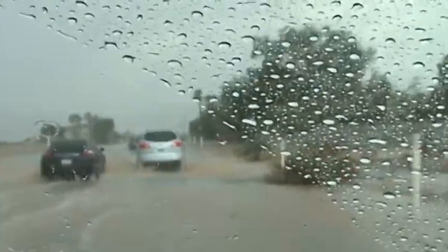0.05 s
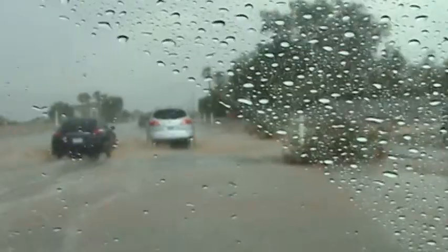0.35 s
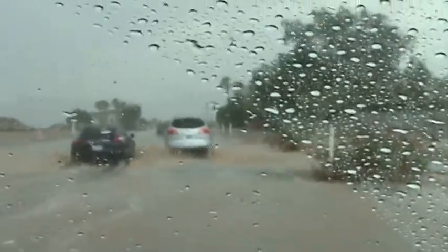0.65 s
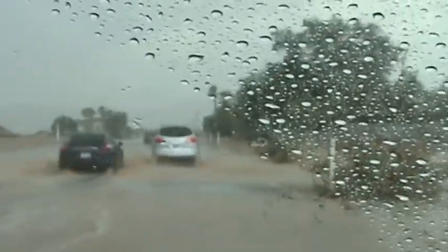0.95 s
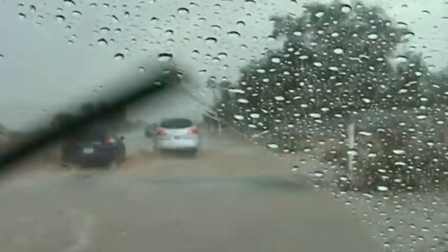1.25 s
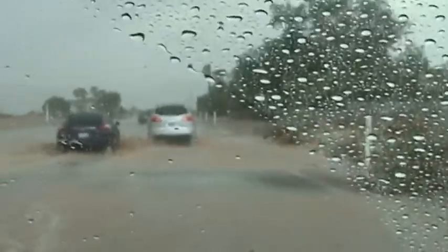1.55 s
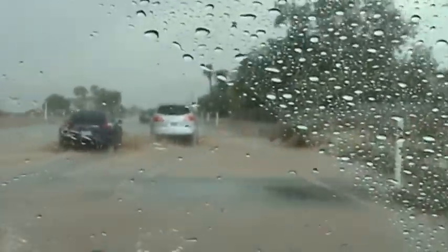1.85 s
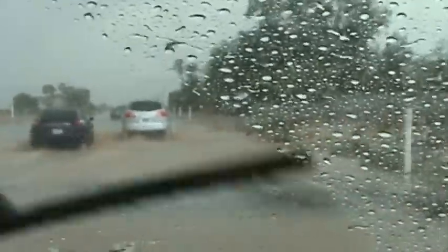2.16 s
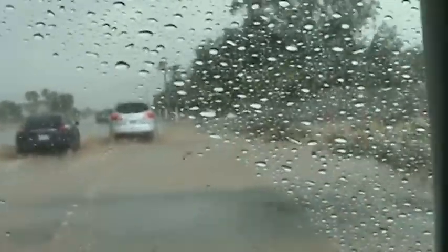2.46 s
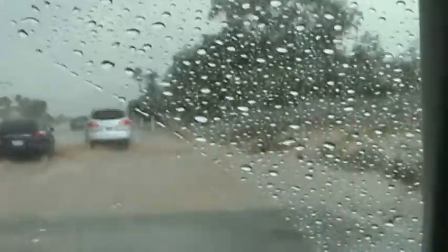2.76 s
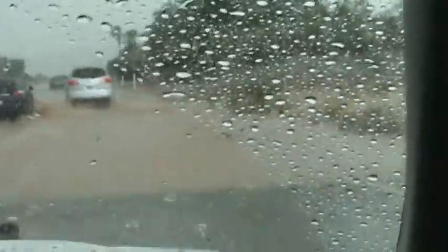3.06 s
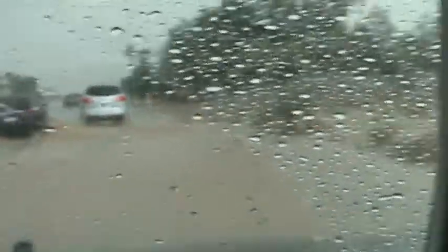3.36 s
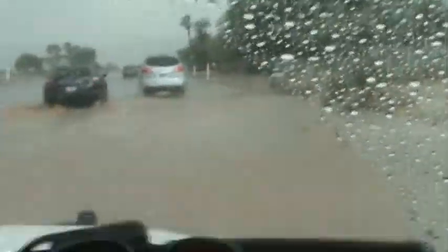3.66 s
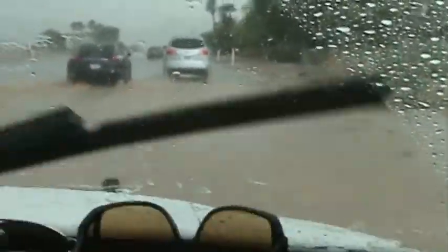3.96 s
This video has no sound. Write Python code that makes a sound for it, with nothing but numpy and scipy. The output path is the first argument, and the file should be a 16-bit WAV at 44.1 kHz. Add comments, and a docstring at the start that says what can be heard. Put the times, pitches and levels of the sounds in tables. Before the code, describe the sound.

Rain patters on a windscreen, heard inside a moving car over a low engine hum and road rumble. From about 1.8 seconds the rain thickens and floodwater churns louder, drumming and knocking under the floor. Fat drops smack the glass, sparse at first and densest from 3.3 to 4 seconds. Soft, deep wiper thumps come between 0.5 and 1 second, near 2.4, and after 3.2.

```python
"""Heavy rain on a windscreen, heard from inside a car driving along a flooded road.
Fine drops patter on the glass in flurries and fat ones smack it with a bright spray.
The tyres churn water under the floor, where it drums in waves and knocks on the panels.
Underneath, the engine hums, the cabin booms with the road, and the wipers thump softly as they turn."""
import sys
import numpy as np
from scipy import signal
from scipy.fft import rfft, irfft
from scipy.io import wavfile
from scipy.ndimage import uniform_filter1d

SR = 44100
rng = np.random.default_rng(int(sys.argv[2]) if len(sys.argv) > 2 else 0)


def int16_out(signal):
    """Quantize to a 16-bit WAV file."""
    q = np.round(np.clip(np.atleast_2d(signal).T, -1, 1) * 32767)
    wavfile.write(sys.argv[1], SR, q.astype(np.int16))


N = 176400

# tone of a drop smacking the glass: (frequency [Hz], relative level [dB])
SMACK_COLOUR = [(500,-21),(1200,-11),(2000,-4),(2500,0),(3100,2.5),(4500,-1),(7000,-12.5),(12000,-45)]


def undb(db):
    """Decibels to gain."""
    return 10 ** (np.asarray(db) / 20)


def curve(rows):
    """Join (time [s], value) points by straight lines."""
    return np.interp(np.arange(N) / SR, *np.array(rows).T)


def over_freq(rows, size=N):
    """Join (frequency [Hz], value) points on a log-frequency axis."""
    hz, value = np.array(rows, float).T
    return np.interp(np.log(np.arange(size // 2 + 1) * SR / size + 1), np.log(hz + 1), value)


def colour(x, rows):
    """Minimum-phase EQ of unit energy, shaped by (frequency [Hz], level [dB]) points."""
    size = 32768
    cepstrum = irfft(np.log(undb(over_freq(rows, size))), size)
    cepstrum[1:size // 2] *= 2  # folded forward, so the ring follows the hit
    cepstrum[size // 2 + 1:] = 0
    ring = irfft(np.exp(rfft(cepstrum)), size)[:size // 2]
    return signal.fftconvolve(x, ring[None] / np.linalg.norm(ring), axes=1)[:, :x.shape[1]]


def drift(per_s):
    """Smooth random wander with a spread near 1."""
    hold = int(SR / per_s)
    steps = np.repeat(rng.standard_normal(N // hold + 1), hold)
    return np.sqrt(2) * uniform_filter1d(uniform_filter1d(steps, hold), hold)[:N]


def impacts(per_s, spread_db, decay_s, tail_db):
    """Two independent showers of hits at rms 1, most weak, a few strong, each with a noisy splash."""
    strength = undb(spread_db * np.minimum(rng.exponential(size=(2, N)), 6))
    hits = (rng.random((2, N)) < per_s / SR) * strength * rng.choice([-1, 1], (2, N))
    pole = np.exp(-2 / (decay_s * SR))
    splash_env = np.sqrt(signal.lfilter([1 - pole], [1, -pole], hits ** 2))
    shower = hits + undb(tail_db) * splash_env * rng.standard_normal((2, N))
    return shower / np.sqrt(np.mean(shower ** 2))


def thud(at, db, hz, rise_s):
    """A soft blow that swells and dies in a low resonance of the car."""
    age = np.maximum(np.arange(N) / SR - at, 0)
    env = age / rise_s * np.exp(1 - age / rise_s)
    return undb(db) * env * np.sin(2 * np.pi * (hz * age + rng.random()))


def road_rumble():
    """The road shakes the panels and makes the cabin air boom."""
    # rumble through the body: (time [s], relative level [dB])
    road_level = [(0,-32),(.6,-31.5),(1.2,-35.5),(1.6,-35),(1.75,-27.5),(1.95,-28.5),(2.2,-28.5),(2.35,-28.5),(2.55,-26.5),(2.7,-24.5),(3.35,-26),(3.5,-30),(4,-29.5)]
    # its tone: (frequency [Hz], relative level [dB])
    road_colour = [(40,-16),(80,0.5),(100,-3),(125,1.5),(165,2),(195,-5.5),(225,-3),(270,-11),(400,-23.5),(1000,-67)]
    # cabin boom: (time [s], level [dB])
    boom_level = [(0,-27.5),(.4,-24),(.8,-31.5),(1.15,-28.5),(1.5,-22.5),(2.1,-30.5),(2.7,-23),(3.3,-24),(3.5,-28.5),(4,-23.5)]
    # its tone: (frequency [Hz], relative level [dB])
    boom_colour = [(5,-20),(15,-6),(25,-6.5),(35,-9.5),(44,2),(52,5),(60,-2.5),(72,-14.5),(110,-12),(300,-74)]
    road = colour(rng.standard_normal((2, N)), road_colour) * undb(curve(road_level) + 0.5)
    boom = colour(rng.standard_normal((2, N)), boom_colour) * undb(curve(boom_level))
    return road + boom


def engine():
    """A low hum of three firing orders, wavering in pitch and strength."""
    # engine speed: (time [s], firing rate [Hz])
    firing_rate = [(0,82.3),(.45,77.4),(.75,79.8),(1.05,84.03),(1.5,85.3),(1.8,83.5),(2.25,80.16),(2.5,85.7),(2.7,79.4),(2.95,84.2),(3.3,82),(3.7,84.97),(4,84.3)]
    # first three orders: (level [dB])
    orders_db = [-38.5,-38.5,-53.5]
    pitch_waver, waver_db = 0.01224, 3.5
    phase = 2 * np.pi * np.cumsum(curve(firing_rate) * (1 + pitch_waver * drift(14))) / SR
    return sum(np.sqrt(2) * np.sin(order * phase) * undb(db + waver_db * drift(9))
               for order, db in enumerate(orders_db, 1))


def wiper_thumps():
    """The wipers and the car's body give deep, soft thumps."""
    # thumps: (time [s], level [dB])
    thumps = [(.505,-17.5),(0.614,-16.5),(0.956,-17),(2.371,-13),(3.24,-15.5),(3.585,-12),(3.815,-18.5)]
    return sum(thud(at, db, hz=51.3, rise_s=0.0093) for at, db in thumps)


def tyre_churn():
    """Water thrown by the tyres slaps the wheel arches and floor in a dense, uneven wash."""
    # water under the wheels: (time [s], relative level [dB])
    churn_level = [(0,-37),(.35,-38.5),(.8,-37.5),(1.3,-36.5),(1.8,-35),(2.1,-30.5),(2.45,-32.5),(2.8,-30),(3.2,-29),(3.5,-30),(3.8,-33),(4,-32.5)]
    # its tone: (frequency [Hz], relative level [dB])
    churn_colour = [(150,-13.5),(230,-6),(300,0.5),(400,1.5),(520,0),(700,-6.5),(950,-5.5),(1150,-12.5),(1600,-16),(3000,-20.5),(8000,-66)]
    slaps = impacts(per_s=1800, spread_db=2.5, decay_s=0.017, tail_db=-2)
    return colour(slaps, churn_colour) * undb(curve(churn_level) - 0.5 + drift(18))


def floor_surges():
    """Waves of floodwater drum on the floor pan."""
    # waves: (time [s], level [dB], pitch [Hz])
    surges = [(1.65,-22.5,162),(1.752,-18,164.7),(2.01,-24.5,226.5),(2.315,-22,159.7),(2.465,-21.5,209.6),(2.61,-23,183),(2.68,-23.5,165),(2.865,-17,169),(3.31,-19,165)]
    return sum(thud(at, db, hz, rise_s=0.014) for at, db, hz in surges)


def panel_knocks():
    """Slugs of thrown water strike the panels, which ring short and hollow."""
    # strikes: (time [s], relative level [dB], pitch [Hz], decay [ms])
    knocks = [(.329,-24.5,510,9.6),(.408,-21.5,560,7),(.921,-26,487,13.5),(1.777,-25,540,8.7),(1.889,-28,500,18),(2.55,-24,900,5.9),(3.293,-23.5,558,11),(3.774,-23,802,9),(3.7925,-12.5,865,5.5)]
    # panel resonances: (multiple of the pitch, relative level [dB])
    modes = [(1,-2.5),(1.34,-10.5),(1.54,-13),(2.08,-13.5)]
    rise_s = 0.00083
    out = np.zeros(N)
    for at, db, hz, decay_ms in knocks:
        age = np.maximum(np.arange(N) / SR - at, 0)
        env = (1 - np.exp(-age / rise_s)) * np.exp(-age * 1000 / decay_ms)
        for ratio, mode_db in modes:
            out += env * undb(db + mode_db) * np.sin(2 * np.pi * hz * ratio * age)
    return out


def fine_rain():
    """Fine drops patter on the glass in flurries; middling ones tick through, under a bright mist."""
    # patter and ticks: (time [s], relative level [dB])
    rain_level = [(0,-39),(.08,-45),(.25,-46.5),(.4,-48.5),(.53,-45.5),(.59,-44),(.8,-43.5),(1,-42),(1.22,-43),(1.38,-47),(1.5,-41.5),(1.68,-46.5),(1.86,-45),(1.96,-39),(2.05,-33.5),(2.2,-35.5),(2.35,-39.5),(2.65,-38),(2.9,-38),(3.15,-40),(3.28,-38),(3.37,-35),(3.5,-40.5),(3.78,-41),(4,-41.5)]
    # tone of the patter: (frequency [Hz], relative level [dB])
    patter_colour = [(500,-11.5),(900,-8),(1300,-4),(1900,-3.5),(2400,-6.5),(3100,-2),(4300,-6.5),(5500,-11.5),(7000,-15.5),(8750,-19),(11800,-27.5),(15500,-39.5)]
    # finest spray, thickening in the downpour: (time [s], level [dB])
    mist_level = [(0,-55),(.4,-73),(.53,-65),(.6,-60),(1.2,-62),(1.4,-66),(1.5,-57),(1.85,-70),(1.95,-50.5),(2.06,-49),(2.3,-55),(2.9,-51),(3.4,-53.5),(4,-50)]
    # its tone: (frequency [Hz], relative level [dB])
    mist_colour = [(2000,-30),(4500,3.5),(7000,4),(10000,-7.5),(13000,-23),(16000,-25)]
    patter = colour(impacts(per_s=2500, spread_db=3.5, decay_s=0.014, tail_db=1), patter_colour)
    ticks = colour(impacts(per_s=70, spread_db=0.5, decay_s=0.0027, tail_db=6), SMACK_COLOUR)
    mist = colour(impacts(per_s=300, spread_db=4.5, decay_s=0.0014, tail_db=-4.5), mist_colour)
    drops = (patter + undb(-9.5) * ticks) * undb(curve(rain_level) + 1)
    flutter = undb(0.5 * drift(24.24))
    return (drops + mist * undb(curve(mist_level))) * flutter


def fat_drops():
    """Each fat drop clicks, bursts at a pitch set by where it lands, and leaves a faint cabin tail."""
    # drops on the glass and bodywork, at relative levels:
    # (time [s], knock [dB], smack [dB], spray [dB], burst decay [ms], pitch factor of knock and smack)
    drops = [(.573,-40,-31,-42,2.4,1.1),(0.9197,-21.5,-23,-39,3.3,0.74),(1.4956,-48,-27.5,-38.5,4.7,1.05),
             (1.753,-42,-31,-42,2,0.95),(1.7757,-22,-19.5,-39,2.9,0.9),(1.880,-46,-30.5,-41.5,2.8,1),(1.9215,-34,-23.5,-35.5,5.2,0.97),(2.028,-31,-32,-40,14,1),(2.108,-36,-35,-42,8,1.4),(2.181,-36,-31,-43,2.5,1.1),(2.24,-40,-37,-38,2,1.3),(2.424,-26.5,-32,-40,10,1.05),
             (2.5446,-22,-21,-36.5,4.6,0.96),(2.7345,-28,-23,-39,4.15,0.8),(2.83,-40,-27,-43,3,0.83),(2.8714,-28,-24.5,-34,5.1,0.88),(2.946,-22,-22.5,-36.5,4,1.1),(3.1231,-23,-29,-37.5,3.5,0.85),
             (3.267,-37,-27.5,-41,3.6,0.98),(3.286,-23,-26.5,-42,4.7,0.94),(3.355,-30,-33,-44,4,0.88),(3.373,-41,-27,-44,2.5,1.25),(3.465,-42,-31,-37,1,1.2),(3.5385,-28,-27,-32.5,.8,1.24),(3.5616,-20,-21,-36.5,5.6,0.79),(3.572,-23.5,-22.5,-40,6.2,0.92),
             (3.5887,-20.5,-19,-28.5,4.55,1),(3.663,-23.5,-26,-41,3.9,0.7),(3.698,-37,-29.5,-62,4.6,0.8),(3.7334,-24.5,-23,-32.5,6,0.89),
             (3.808,-34,-26.5,-34.5,7.4,0.98),(3.830,-28,-25.5,-35,5.5,1.16),(3.8991,-37,-19,-32,2.8,1.2),(3.9213,-28,-20,-33,4.3,0.99),(3.942,-38,-26.5,-29.5,5.9,0.73)]
    # a drop's low knock: (frequency [Hz], relative level [dB])
    knock_colour = [(100,-28),(250,1),(500,-2.5),(850,-2),(1400,-3.5),(2300,-5.5),(6000,-70)]
    # its bright spray: (frequency [Hz], relative level [dB])
    spray_colour = [(2000,-42),(4500,-2.5),(7000,5),(10500,-3.5),(13000,-12),(16000,-24)]
    rise_s, tail_s = 0.00073, 0.019
    click_db, tail_db, trim_db = 10.5, -14, 0.94
    t = np.arange(4096) / SR
    click = undb(click_db) * (t == 0)
    tail = undb(tail_db) * np.exp(-t / tail_s)
    out = np.zeros((2, N + len(t)))
    for at, knock_db, smack_db, spray_db, decay_ms, pitch in drops:
        burst = np.exp(-t * 1000 / decay_ms)
        env = (1 - np.exp(-t / rise_s)) * (burst + tail)
        start = int(at * SR)
        for db, shape, shift in ((knock_db, knock_colour, pitch),
                                 (smack_db, SMACK_COLOUR, pitch),
                                 (spray_db, spray_colour, 1)):
            splash = click + rng.choice([-1, 1], (2, len(t))) * env
            tuned_shape = np.array(shape) * [shift, 1]
            out[:, start:start + len(t)] += undb(db + trim_db) * colour(splash, tuned_shape)
    return out[:, :N]


def scene():
    """Mix the cabin in mid and side, then spread it to left and right band by band."""
    # stereo image: (frequency [Hz], left minus right [dB], side level [dB], left phase lead [rad])
    image = [(30,-1.5,-32,-0.016),(70,-1.5,-11,0.45),(125,1,-17,0.61),(260,4.5,-9.5,1),(500,6.5,-11,0.76),(806,6.5,-16,-0.91),(1680,1,-14,-0.57),(3200,0.4,-9.5,-0.18),(8000,0.5,-11.5,-0.62),(15000,-1,-7,0)]
    tonal = panel_knocks() + engine() + wiper_thumps() + floor_surges()
    mid_side = fine_rain() + fat_drops() + tyre_churn() + road_rumble()
    mid_side[0] += tonal
    mid, side = rfft(mid_side)
    balance_db, side_db, lead = (over_freq(np.array(image)[:, [0, k]]) for k in (1, 2, 3))
    sign = np.array([[1], [-1]])  # left, right
    stereo = mid + sign * undb(side_db) * side
    pan = undb(sign * balance_db / 2) * np.exp(0.5j * sign * lead)
    return irfft(stereo * pan, N)


def record(dry):
    """A steep low-pass takes off the very top."""
    cutoff_hz = 15800
    return signal.sosfilt(signal.ellip(10, 0.2, 80, cutoff_hz, fs=SR, output="sos"), dry)


dry = scene()
out = record(dry)
int16_out(out)
```